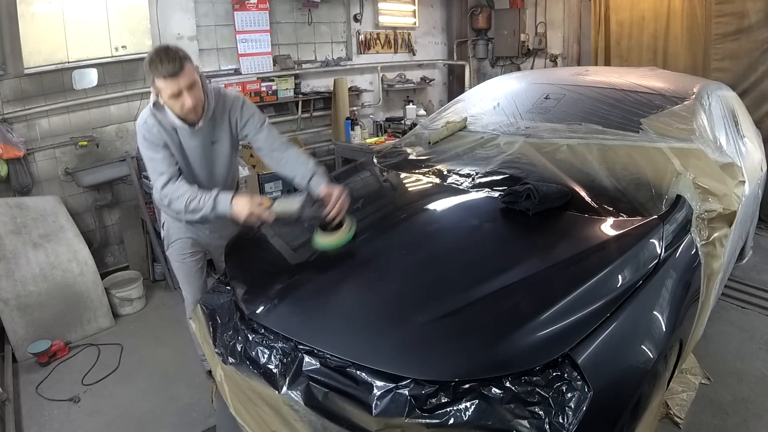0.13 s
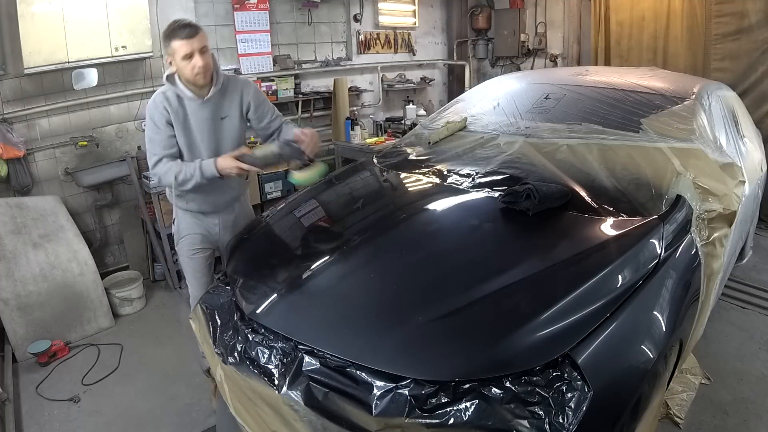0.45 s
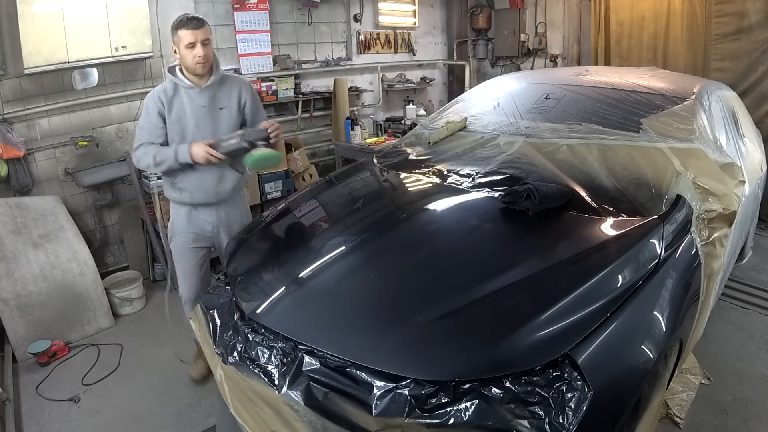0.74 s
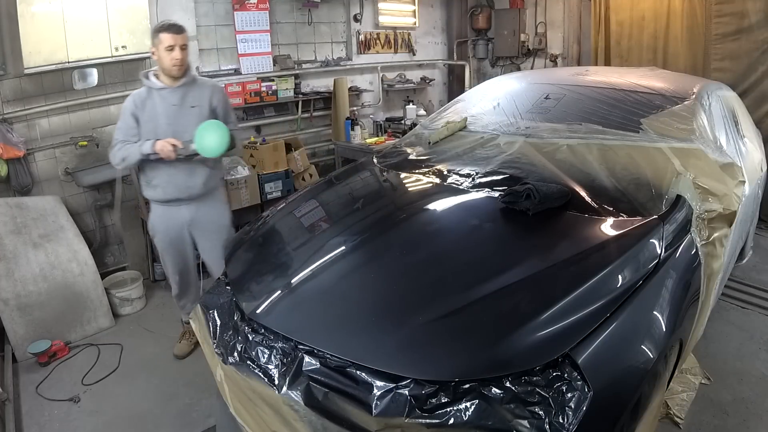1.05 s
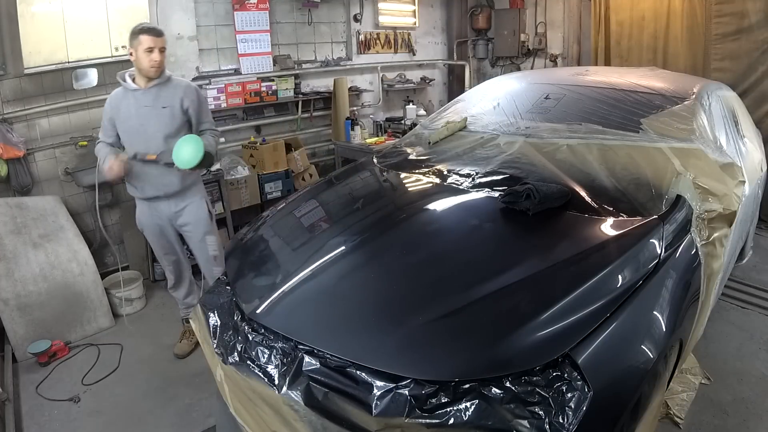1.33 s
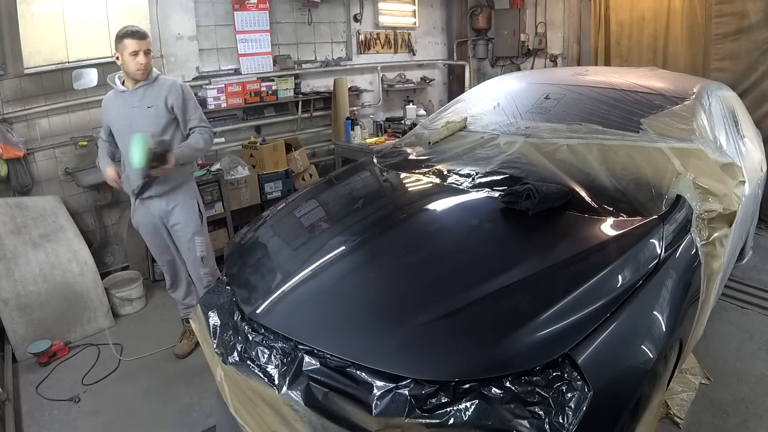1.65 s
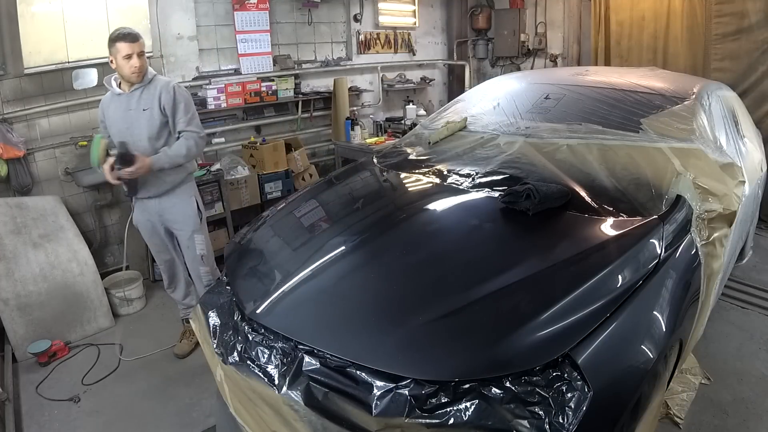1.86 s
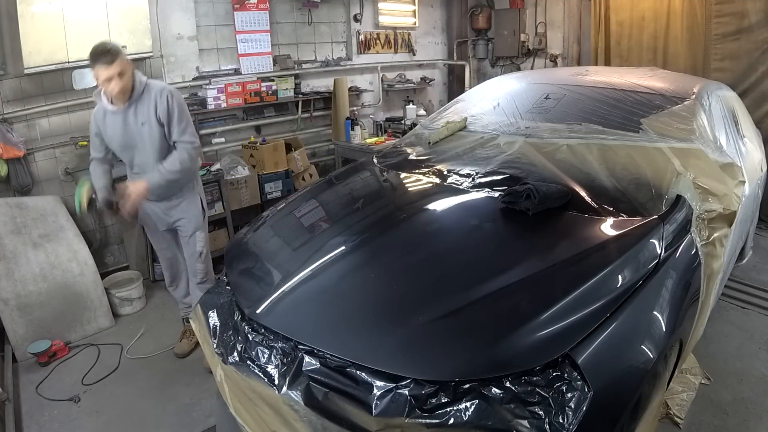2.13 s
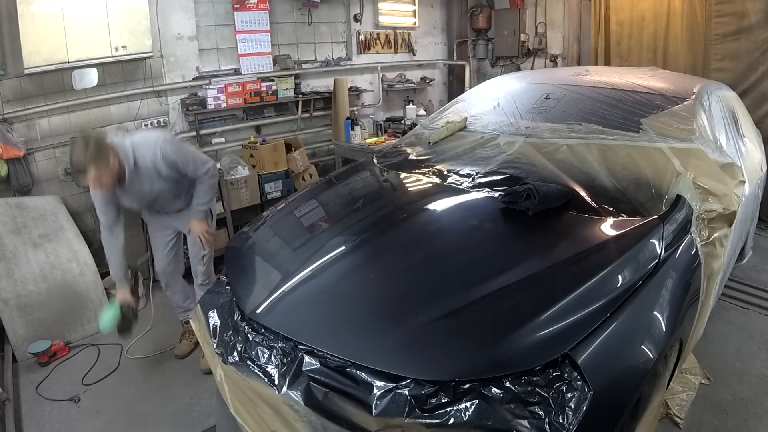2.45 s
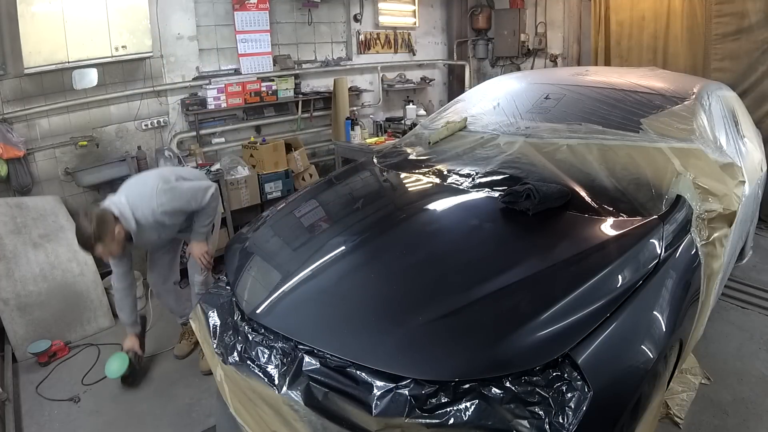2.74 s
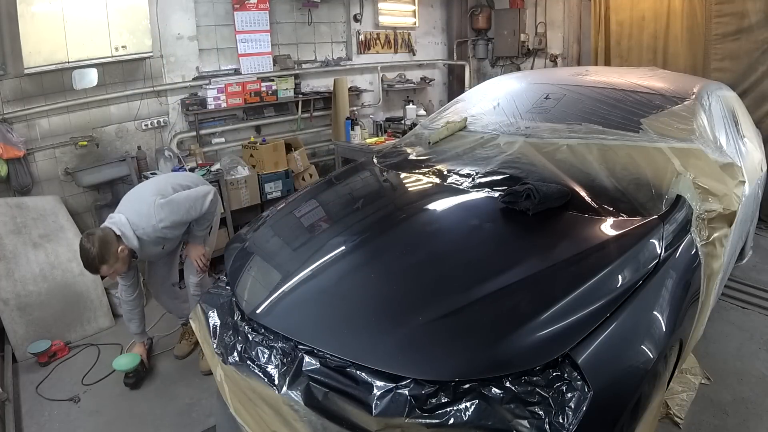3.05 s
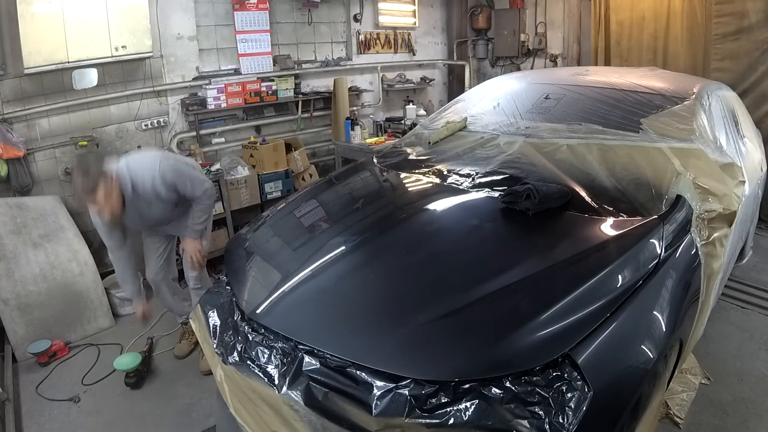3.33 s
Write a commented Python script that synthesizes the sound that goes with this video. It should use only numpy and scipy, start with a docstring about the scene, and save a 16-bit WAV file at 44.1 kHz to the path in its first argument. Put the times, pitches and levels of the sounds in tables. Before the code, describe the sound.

An electric polisher runs with a rough, airy whir and gear whine until about 0.3 s, when its trigger snaps and speed briefly rises. It then coasts down, whine and droning rush falling smoothly in pitch and fading. Very faint soft footfalls come near 1.0 and 2.3 s. From 3.0 to 3.35 s the still-turning machine knocks and scuffs on the floor in a small reverberant workshop, in stereo.

```python
"""An electric polisher, lifted off a car bonnet and switched off, coasts down in a workshop.
Gears, fan blades and rotor slots sing as sines on multiples of the falling shaft speed.
Air and gear noise is filtered noise coloured by that speed; casing resonances drone in it.
The trigger snaps, feet thud softly, and the machine is laid on the floor still turning:
struck casing modes ring, and a burst of noise scuffs after each knock."""
import sys
import numpy as np
from scipy import signal
from scipy.fft import rfft, irfft, next_fast_len
from scipy.io import wavfile

SR = 44100
rng = np.random.default_rng(int(sys.argv[2]) if len(sys.argv) > 2 else 0)


def waveform_to_disk(signal):
    """Save audio, clipped to [-1, 1], as 16-bit WAV at the path in sys.argv[1]."""
    frames = np.transpose(np.atleast_2d(signal))
    scaled = np.clip(frames, -1, 1) * 32767
    samples = np.round(scaled).astype(np.int16)
    wavfile.write(sys.argv[1], SR, samples)


def gain_from_decibels(decibels):
    """Convert decibel values to linear amplitude factors."""
    exponent = np.asarray(decibels, float) / 20
    return 10 ** exponent


N = 154350
T = np.arange(N) / SR

# shaft speed: (time [s], speed [turns/s])
SHAFT_SPEED = [(0, 219.3), (.1, 217.2), (.2, 218.2), (.28, 224.5), (.35, 231.5), (.42, 227.8), (.55, 220.8),
               (.75, 210.1), (1, 197.0), (1.3, 182.0), (1.6, 167.8), (2, 151.1), (2.4, 136.0), (2.8, 120.7),
               (3.1, 111.5), (3.5, 99)]
# the machine is turned about: (time [s], air and gear noise [dB], outlet towards the microphone [dB],
# casing drone [dB], gear rumble [dB])
HANDLING = [(0.0, -41.5, -3, 2.5, -5), (0.27, -38.5, -5, 1.5, -6), (0.33, -41, 0, 4.5, -10.5),
            (0.44, -42, -1.5, 3, -7), (0.66, -45, -0.5, 4.5, -15), (0.73, -44.5, -1, 3.5, -14),
            (1.2, -48, -1, 1.5, -3.5), (1.23, -49, -0.5, 2.5, -7), (2.45, -53.5, 0, 3, -17),
            (2.77, -53.5, -2.5, 1.5, -41), (2.9, -53.5, -2.5, 1, -28)]
# gear lines under load: (multiple of shaft speed [1], level [dB])
LOADED_LINES = [(5, -34.5), (9, -55), (10, -50), (14, -52), (15, -50)]
# fan and unbalance lines while coasting: (multiple of shaft speed [1], level over the noise setting [dB])
COASTING_LINES = [(2, -13), (12, -14), (15, -13.5)]
# hum of the unbalanced shaft, close to once a turn: (time [s], level [dB])
UNBALANCE = [(0, -70), (.15, -66), (.25, -56), (.45, -66), (.7, -67), (.95, -62), (1.2, -70), (1.5, -76),
             (2.0, -87), (3.0, -100)]
# slot whine comes and goes: (time [s], level [dB])
WHINE = [(.28, -80), (.32, -62), (.45, -59), (.6, -58), (.65, -80), (2.02, -80), (2.07, -66), (2.16, -65),
         (2.2, -80), (2.8, -80), (2.86, -65), (3.0, -69), (3.05, -64), (3.35, -66), (3.5, -75)]
# rotor slot lines: (multiple of shaft speed [1], level over the whine [dB])
SLOT_LINES = [(24, 2), (30, -4), (36, 0), (48, -2), (60, -14), (72, -5), (96, -6), (120, -14)]
# casing resonances that radiate a passing line: (frequency [Hz], half-width [Hz], gain [dB])
RADIATION = [(410, 40, 11), (1500, 200, -8), (1850, 150, 4), (2330, 260, -5), (2900, 100, 7),
             (5430, 180, 7), (8050, 300, 6)]
# hums of fixed pitch that swell briefly, casing modes and short stretches of gear and shaft lines: (middle [s],
# length [s], frequency [Hz], level [dB])
HUMS = [(.7, .45, 416, -49), (.57, .25, 752, -50), (.05, .15, 860, -50), (.27, .1, 840, -49),
        (.318, .045, 2280, -48), (.34, .08, 3495, -51), (1.75, .35, 640, -60), (3.45, .13, 206, -59)]
# noise colour at high, middle and low speed: (frequency [Hz], relative power density [dB])
COLOUR_FAST = [(59, -83), (100, -81), (214, -16.5), (264, -22), (861, -7), (998, -22), (1090, -9),
               (1430, -13), (3390, -11), (15500, -27.5)]
COLOUR_MIDDLE = [(59, -80), (100, -94), (173, -31), (300, -19.5), (541, -5.5), (1620, -11.5), (2130, -11.5),
                 (4280, -17), (13900, -29), (15500, -31)]
COLOUR_SLOW = [(59, -111), (100, -103.5), (697, -5), (758, 1), (1040, -1.5), (1130, -14), (1620, -19),
               (1840, -7.5), (5750, -16), (15500, -30.5)]
# speeds of the slow, middle and fast colours: (speed [turns/s])
COLOUR_SPEEDS = [119, 186.3, 233]
# casing resonances droning in the noise: (frequency [Hz], bandwidth [Hz], relative level [dB])
CASING_PEAKS = [(785, 10.6, 1), (838, 7.6, -8.5), (1190, 206, 2)]
# trigger clicks: (time [s], relative level [dB])
TRIGGER = [(.27, -40), (0.304, -36)]
# soft footfalls: (time [s], relative level [dB], frequency [Hz])
FOOTFALLS = [(1.023, -66, 186), (2.329, -65, 144)]
# the casing knocks on the floor: (time [s], relative level [dB], hard edge over it [dB])
KNOCKS = [(3.024, -30, 2), (3.05, -33, 1), (3.066, -43.5, 9), (3.09, -42, -2), (3.12, -47, 8),
          (3.159, -31.5, -16), (3.189, -39, 1), (3.206, -24.5, -7.5), (3.269, -35, -1), (3.307, -36, -19),
          (3.328, -36.5, -17)]
# casing modes rung by soft pushes: (frequency [Hz], relative level [dB], decay by 60 dB [s])
LOW_MODES = [(116, -11, 0.084), (185, -5.5, 0.17), (213.5, 4.5, 0.16), (333, -11, 0.13), (500, -14, 0.09)]
# casing modes rung by hard edges: (frequency [Hz], relative level [dB], decay by 60 dB [s])
HIGH_MODES = [(853, -6.5, 0.11), (870, -0.5, 0.16), (1031, 0.5, 0.053), (1570, -2, 0.019),
              (2310, -10, 0.064), (3430, -9, 0.055)]
# pass band of the scuffing noise: (corner frequency [Hz])
SCUFF_BAND = [280, 1130]
# correlation of left and right: (frequency [Hz], likeness [1])
LIKENESS = [(60, 0.8), (300, 1), (700, 1), (1100, 0.99), (1800, 0.063), (3000, 0.028)]
# left over right level, the right treble nearly empty: (frequency [Hz], left over right [dB])
LEFT_OVER_RIGHT = [(60, -13), (130, 1), (290, -2.5), (640, -2.5), (1410, 1), (3100, 5.5), (6820, 9),
                   (11000, 51.5), (15000, 19)]

LINE_WAVER_DB, WHINE_WAVER_DB = 2.5, 4.2   # spread of the low lines, and of the whining ones


def rms_one(x):
    """Normalisation to unit mean power."""
    return x / np.sqrt(np.mean(x ** 2) + 1e-20)


def in_time(rows):
    """Linear interpolation of each column over time."""
    s, *columns = np.transpose(rows)
    return [np.interp(T, s, c) for c in columns]


def at_hz(points, hz):
    """Interpolation along a logarithmic frequency axis."""
    points = np.array(points)
    return np.interp(np.log(hz), np.log(points[:, 0]), points[:, 1])


def filtered(x, order, hz, kind="low"):
    """Butterworth filtering: a maximally flat pass band."""
    return signal.sosfilt(signal.butter(order, hz, kind, fs=SR, output="sos"), x)


def drift(rate_hz):
    """Slow random fluctuation of spread 1: noise through two equal low-pass poles."""
    hop, settle = 40, 2000
    r = np.exp(-2 * np.pi * rate_hz * hop / SR)
    slow = signal.lfilter([1], [1, -2 * r, r * r], rng.standard_normal(N // hop + settle + 2))
    slow = rms_one(slow[settle:])
    return np.interp(np.arange(N) / hop, np.arange(len(slow)), slow)


def ring(force, hz, t60):
    """Damped resonator: a unit click sets a decaying sine of initial height 1 ringing."""
    r, w = gain_from_decibels(-60 / (t60 * SR)), 2 * np.pi * hz / SR
    return signal.lfilter([0, np.sin(w)], [1, -2 * r * np.cos(w), r * r], force + 1e-18)


def ring_time(width_hz):
    """Reciprocity of bandwidth and decay: the time to fall by 60 dB."""
    return np.log(1000) / (np.pi * width_hz)


def strikes(s, db):
    """Impulsive excitation: clicks, each with a random strength about its level."""
    clicks = np.zeros(N)
    clicks[(np.asarray(s) * SR).astype(int)] = gain_from_decibels(db + rng.normal(0, 1.23, len(s)))
    return clicks


def fading_noise(clicks, t60):
    """Exponential decay: each click starts a burst of noise that dies away."""
    return signal.lfilter([1], [1, -gain_from_decibels(-60 / (t60 * SR))], clicks) * rng.standard_normal(N)


def to_sides(mid, side, hz):
    """Partial coherence: common and opposed parts mixed to the likeness of left and right."""
    alike = np.clip(at_hz(LIKENESS, hz), 0, 1)
    return np.sqrt((1 + alike) / 2) * mid + np.sqrt((1 - alike) / 2) * side * [[1], [-1]]


def tone(turns, multiple, db, waver_db=LINE_WAVER_DB):
    """Harmonic of rotation: a wavering sine locked to the shaft angle but for a slight jitter."""
    angle = turns + 0.002 * drift(45)   # in turns
    phase = 2 * np.pi * (multiple * angle + rng.random())
    return np.sqrt(2) * gain_from_decibels(db + waver_db * drift(20)) * np.sin(phase)


def line_waver_db(multiple):
    """Unsteadiness of a line: the higher multiples waver more."""
    return LINE_WAVER_DB if multiple < 6 else WHINE_WAVER_DB


def radiation_db(line_hz):
    """Resonant radiation: the casing changes a line's level as it glides through the resonances."""
    return sum(db * np.exp(-((line_hz - hz) / width) ** 2) for hz, width, db in RADIATION)


def motor_load():
    """Release of torque: the load falls smoothly from 1 to 0 at switch-off."""
    switch_off_s, unload_s = 0.277, 0.009
    return 1 / (1 + np.exp((T - switch_off_s) / unload_s))


def gear_lines(turns):
    """Tooth meshing: steady multiples of the shaft speed that last as long as the load."""
    lines = sum(tone(turns, k, db, line_waver_db(k)) for k, db in LOADED_LINES)
    return motor_load() * lines


def unbalance_hum(turns):
    """Rotating imbalance: a hum close to once a turn."""
    level_db, = in_time(UNBALANCE)
    return tone(turns, 0.99, level_db)


def air_and_gear_noise(speed, noise_db, outlet_db, drone_db, rumble_db):
    """Turbulence and friction: third-octave noise bands whose colour follows the speed."""
    out, together = 0, drift(6)
    edges = 60 * 2 ** (np.arange(25) / 3)
    white = rng.standard_normal((2, 2, N))   # neighbouring bands take different noise
    for k, (low, high) in enumerate(zip(edges, edges[1:])):
        mid, side = filtered(white[k % 2], 3, [low, high], "band")
        hz = np.sqrt(low * high)
        reference_hz = 350 if hz < 500 else 2400
        colours = [at_hz(c, hz) - at_hz(c, reference_hz)
                   for c in (COLOUR_SLOW, COLOUR_MIDDLE, COLOUR_FAST)]
        band_db = 10 + np.interp(speed, COLOUR_SPEEDS, colours)
        band_db = band_db + (outlet_db - outlet_db.mean()) * (hz > 4000)
        band_db = band_db + (drone_db - drone_db.mean()) * (500 < hz < 1300)
        band_db = band_db + (6.5 + rumble_db) * (hz < 500)
        patchy_db = 0.12 * together + drift(28)
        out = out + gain_from_decibels(band_db + patchy_db) * to_sides(mid, side, hz)
    return gain_from_decibels(noise_db) * out


def casing_drone(noise_db, drone_db):
    """Forced resonance: noise excites narrow casing peaks, which drone."""
    out = 0
    for hz, width, db in CASING_PEAKS:
        mid, side = rng.standard_normal((2, N))
        drone = rms_one(ring(to_sides(mid, side, hz), hz, ring_time(width)))
        relative_db = db - CASING_PEAKS[0][2]
        out = out + gain_from_decibels(-10.5 + relative_db + drone_db) * drone
    return gain_from_decibels(noise_db) * out


def machine_noise(speed, turns, noise_db, outlet_db, drone_db, rumble_db):
    """Amplitude modulation by rotation; the noise holds little below 250 Hz."""
    out = air_and_gear_noise(speed, noise_db, outlet_db, drone_db, rumble_db)
    out = filtered(out + casing_drone(noise_db, drone_db), 4, 246, "high")
    return out * (1 + 0.084 * np.sin(2 * np.pi * turns))


def fixed_hums():
    """Narrow-band resonance: hums of fixed pitch, casing modes and short stretches of gear and shaft lines,
    each under a flat-topped swell."""
    out = 0
    for middle, length, hz, db in HUMS:
        swell = np.exp(-(2 * (T - middle) / length) ** 4)
        hum = rms_one(ring(rng.standard_normal(N), hz, ring_time(8)))
        out = out + gain_from_decibels(db) * swell * hum
    return out


def trigger_snaps():
    """Impact of a light switch: decaying noise without its bass."""
    s, db = np.transpose(TRIGGER)
    return filtered(fading_noise(strikes(s, db), 0.12), 2, 2500, "high")


def coasting_lines(speed, turns, noise_db):
    """Blade passing and imbalance: lines over the noise that come in as the load goes."""
    octaves_up = np.log2(speed / speed.max())   # negative while slower than the top speed
    out = 0
    for k, db in COASTING_LINES:
        level_db = db + noise_db + radiation_db(k * speed)
        if k < 3:
            level_db = level_db + 40 * octaves_up   # unbalance fades by 40 dB per octave
        out = out + tone(turns, k, level_db, line_waver_db(k))
    return out * (1 - motor_load())


def slot_whine(speed, turns):
    """Rotor slotting: high multiples of the shaft speed whine, those not divisible by 24 only at higher speed."""
    whine_db, = in_time(WHINE)
    out = 0
    for k, db in SLOT_LINES:
        in_range = k * speed < 0.4 * SR
        sounds = in_range & ((k % 24 == 0) | (speed > 135))   # turns/s
        out = out + sounds * tone(turns, k, db + whine_db + radiation_db(k * speed), WHINE_WAVER_DB)
    return out


def footfalls():
    """Modal impact: each soft step rings three neighbouring low modes."""
    return sum(ring(strikes([at], db), hz * spread, 0.19)
               for at, db, hz in FOOTFALLS for spread in (0.87, 1, 1.2))


def floor_knocks():
    """Contact stiffness: soft pushes ring low casing modes, hard edges high ones; a scuff follows."""
    s, db, edge_db = np.transpose(KNOCKS)
    low = sum(ring(strikes(s, db + d - 11.5), hz, t60) for hz, d, t60 in LOW_MODES)
    low = filtered(low, 2, 352)   # give of the casing against the floor
    high = sum(ring(strikes(s, db + edge_db + d - 11), hz, t60) for hz, d, t60 in HIGH_MODES)
    scuff = fading_noise(strikes(s, db - 8), 0.27)
    return low + high + filtered(scuff, 2, SCUFF_BAND, "band")


def workshop(x):
    """Reverberation: feedback delays, duller each round, the bass alike on both sides and weak."""
    t60_s, echo_db, wall_hz, bass_hz = 0.5, -6, 5000, 350
    size = next_fast_len(N + SR)
    hz = np.maximum(np.arange(size // 2 + 1) * SR / size, 1)
    wet = np.zeros((2, len(hz)), complex)   # ten delays each for the common and the opposed part
    for k, lag in enumerate(rng.uniform(0.012, 0.05, 20)):
        delay = np.exp(-2j * np.pi * hz * lag)
        loop = gain_from_decibels(-60 * lag / t60_s) / (1 + 1j * hz / wall_hz) * delay
        sign = (-1) ** (k // 2)
        wet[k % 2] += sign * loop / (1 - loop) / np.sqrt(10)
    wet = to_sides(wet[0], wet[1], hz) / (1 + (bass_hz / hz) ** 2)
    return irfft(rfft(x, size) * (1 + gain_from_decibels(echo_db) * wet), size)[:, :N]


def scene():
    """Superposition: the noise stands dry, while lines, hums and impacts excite the room."""
    speed, = in_time(SHAFT_SPEED)
    turns = np.cumsum(speed) / SR
    noise_db, *turned_db = in_time(HANDLING)
    tones = gear_lines(turns) + unbalance_hum(turns) + fixed_hums()
    tones = tones + coasting_lines(speed, turns, noise_db) + slot_whine(speed, turns)
    impacts = trigger_snaps() + footfalls() + floor_knocks()
    return machine_noise(speed, turns, noise_db, *turned_db) + workshop(tones + impacts)


def band_limit(x):
    """A steep low-pass at the top of the band."""
    return signal.sosfilt(signal.butter(12, 15960, fs=SR, output="sos"), x)


def record(dry):
    """Left and right differ in level and time, the right treble nearly empty; bass and top cut and faint
    rumble."""
    size = next_fast_len(N + 4096)
    hz = np.maximum(np.arange(size // 2 + 1) * SR / size, 1)
    lean = gain_from_decibels(at_hz(LEFT_OVER_RIGHT, hz))
    norm = np.sqrt((1 + lean ** 2) / 2)   # keeps the mean power of the two ports
    # the left hears first; in the treble the shadow of the housing hides the lag
    left_lag_s = -0.0002 / (1 + (hz / 2000) ** 6)
    ports = np.array([lean / norm * np.exp(-2j * np.pi * hz * left_lag_s), 1 / norm])
    x = irfft(rfft(dry, size) * ports, size)[:, :N]
    x = filtered(x, 3, 140, "high")
    x = signal.sosfilt(signal.cheby2(20, 60, 15650, fs=SR, output="sos"), x)
    rumble = signal.lfilter([1], [1, -0.98], rng.standard_normal(x.shape)) / 5   # about unit rms
    x = x + gain_from_decibels(-98) * rumble   # noise of the electronics
    return band_limit(x)


dry = scene()
out = record(dry)
waveform_to_disk(out)
```